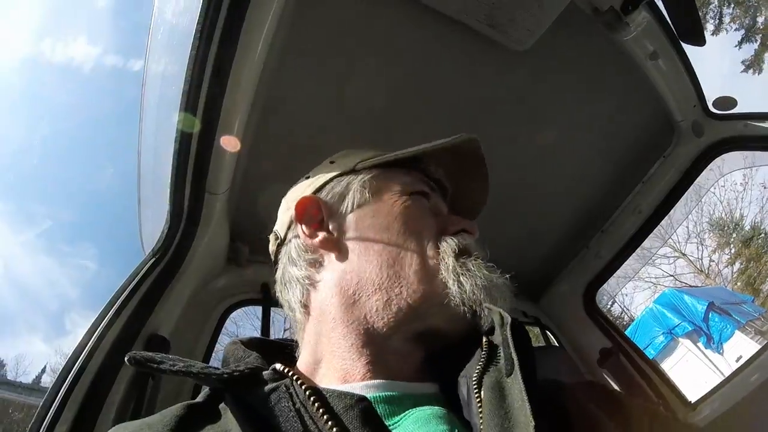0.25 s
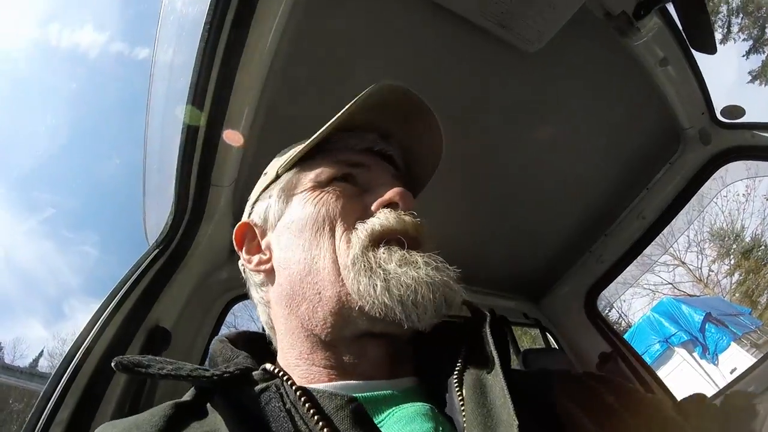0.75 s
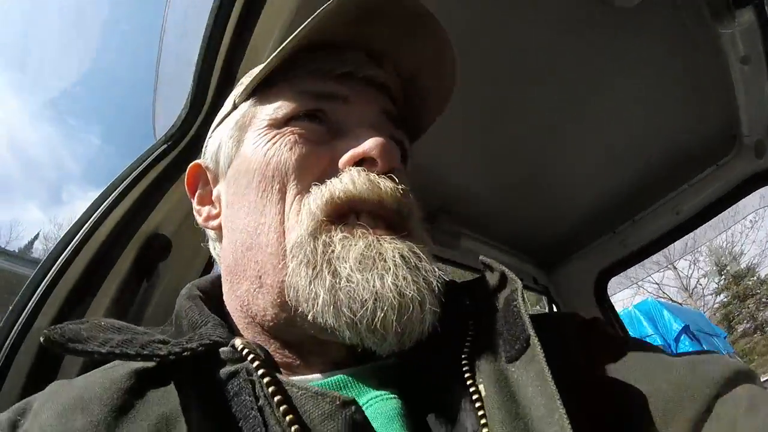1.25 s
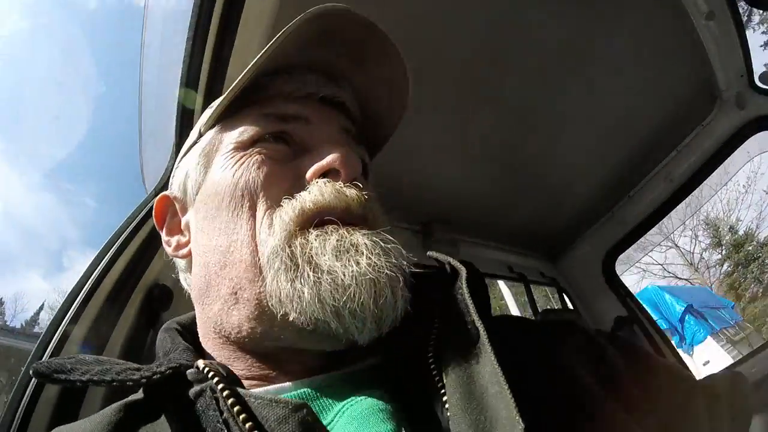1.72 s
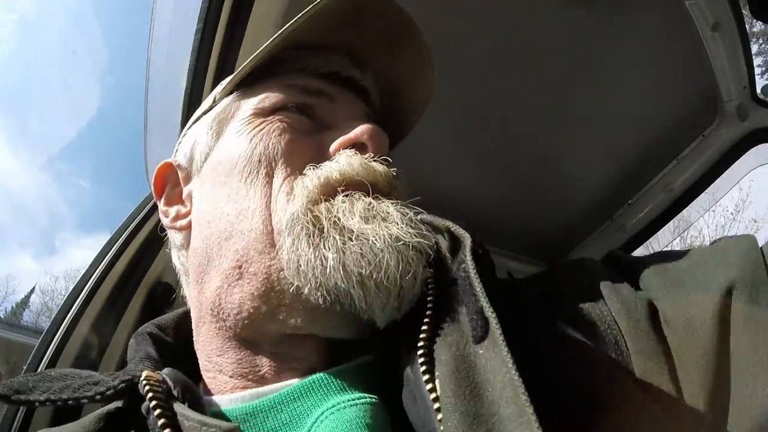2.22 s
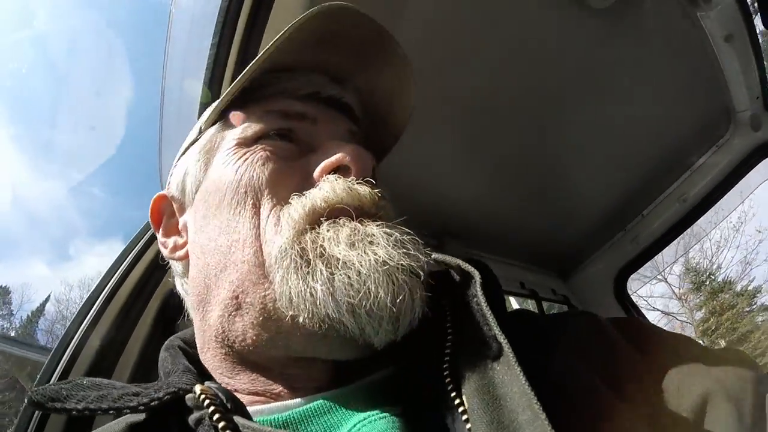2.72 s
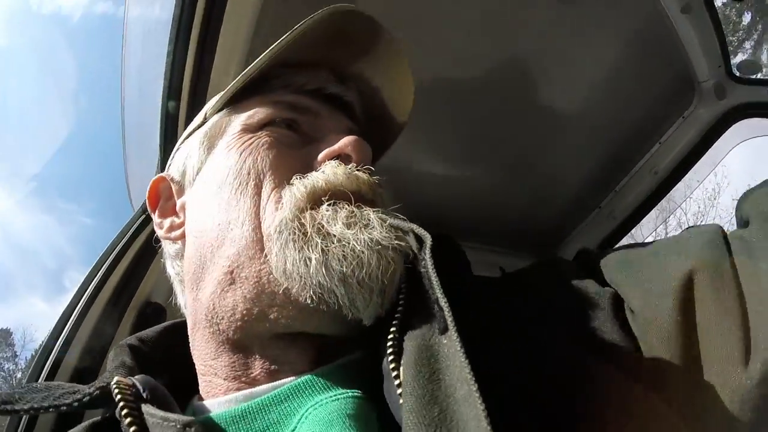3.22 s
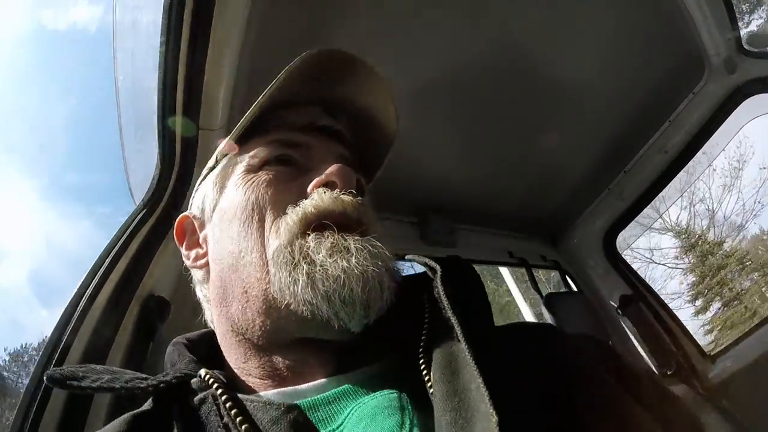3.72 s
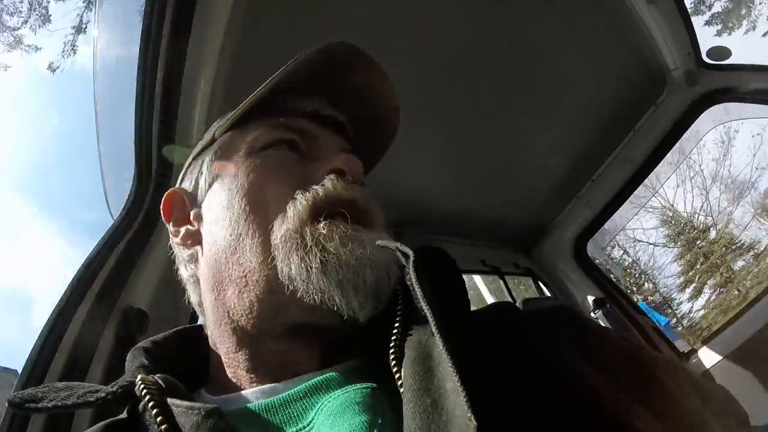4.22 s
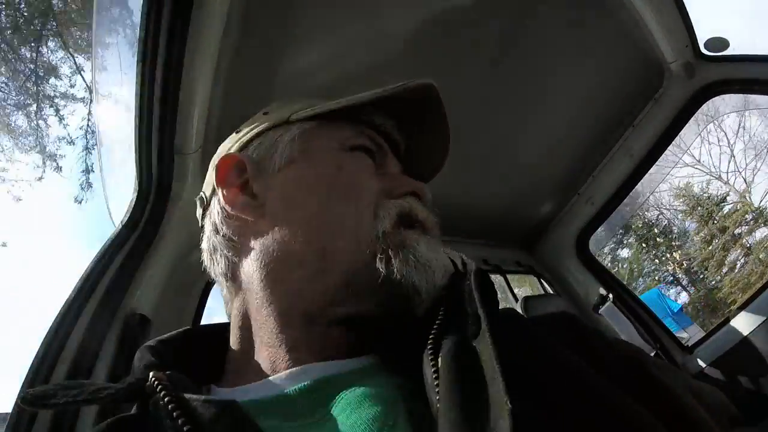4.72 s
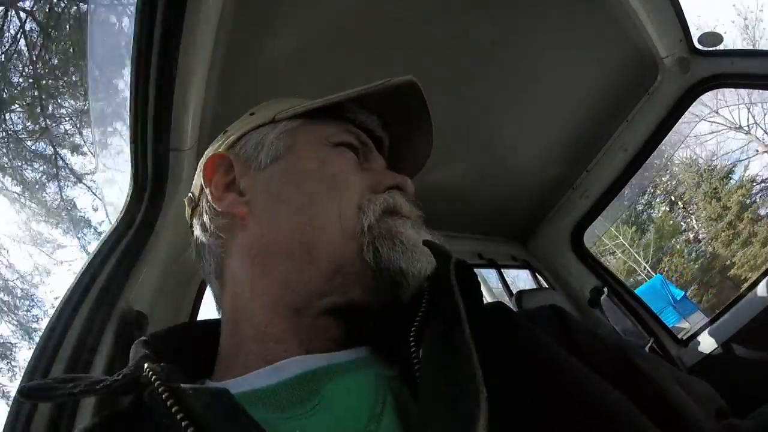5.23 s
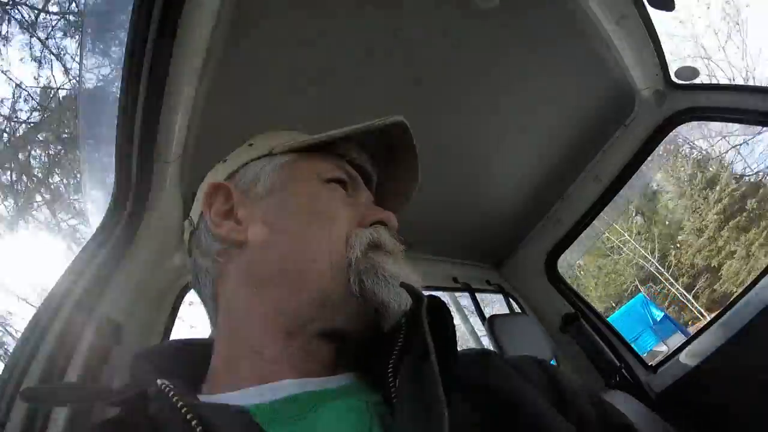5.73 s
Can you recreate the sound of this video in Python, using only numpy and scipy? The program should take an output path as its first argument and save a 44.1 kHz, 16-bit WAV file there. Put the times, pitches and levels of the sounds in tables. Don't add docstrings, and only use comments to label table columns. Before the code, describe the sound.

Inside a small truck cab, a lever clunks over an idling engine, then the clutch shudders and the engine revs up with growing rumble.

```python
import sys
import numpy as np
from scipy import signal
from scipy.fft import rfft, irfft, next_fast_len
from scipy.io import wavfile
from scipy.ndimage import uniform_filter1d, map_coordinates

SR = 44100
rng = np.random.default_rng(int(sys.argv[2]) if len(sys.argv) > 2 else 0)


def dump(signal):
    limited = np.clip(np.atleast_2d(signal).T, -1, 1)
    pcm = np.round(limited * 32767).astype(np.int16)
    wavfile.write(sys.argv[1], SR, pcm)


def gain_from_db(level_db):
    decades = np.asarray(level_db, float) / 20
    return 10 ** decades


N = 262836

# start_s, level_db
ROAD = [(0, -58), (.46, -51), (.58, -50.5), (.85, -52), (1.11, -52), (1.46, -44.5), (1.9, -50.5),
        (2.09, -43.5), (2.14, -41.5), (2.52, -41), (2.85, -48), (3.1, -44), (3.7, -46.5), (4.1, -38.5),
        (4.43, -40.5), (4.57, -38), (5.43, -37), (5.7, -34.5), (5.96, -33.5)]


def unit(x):
    return x / np.sqrt(np.mean(x ** 2) + 1e-20)


def curves(rows):
    s, *cols = np.transpose(rows)
    return [np.interp(np.arange(N) / SR, s, c) for c in cols]


def wobble(rate):
    knots = rng.standard_normal(int(N * rate / SR) + 4)
    return map_coordinates(knots, [np.arange(N) * rate / SR])


def filtered(x, response):
    n = x.shape[-1]
    padded = next_fast_len(n + SR // 4)
    spectrum = rfft(x, padded) * response(np.fft.rfftfreq(padded, 1 / SR))
    return irfft(spectrum, padded)[..., :n]


def colour(points):
    f, db = np.transpose(points)
    return lambda hz: gain_from_db(np.interp(np.log(hz + 1), np.log(f + 1), db, -120, -120))


def modes(table):
    def response(f):
        return sum((-1) ** k * gain_from_db(db) * 1j * f * width / (centre ** 2 - f * f + 1j * f * width)
                   for k, (centre, width, db) in enumerate(table))
    return response


def rush(points, patchy_db, grain_db=0):
    raw = rng.standard_normal(N) * gain_from_db(grain_db * wobble(400))
    z = signal.stft(raw, nperseg=512)[2]
    field = uniform_filter1d(rng.standard_normal(z.shape), 5, 0)
    field = uniform_filter1d(field, 8, 1)
    patched = signal.istft(z * gain_from_db(patchy_db * unit(field)), nperseg=512)[1][:N]
    return unit(filtered(patched, colour(points)))


def swells(rows):
    t = np.arange(N) / SR
    energy = 0
    for s, db, rise, fall in rows:
        bell = np.exp(-((t - s) / np.where(t < s, rise, fall)) ** 2 * 2)
        energy = energy + gain_from_db(2 * db) * bell
    return np.sqrt(energy)


def contacts(rows, t60, rise, push, grit_db):
    # centre_hz, width_hz, level_db
    trim = [(393, 21, 1.5), (496, 50, 10.5), (660, 132, 8.5), (863, 140, 3.5), (1050, 180, 3),
            (1526, 430, -0.5), (2000, 370, -2.5)]
    # centre_hz, width_hz, level_db
    floor = [(133.6, 13.4, 3.5), (203, 21, 1), (260, 84, -5.5), (407, 78, -7)]
    # frequency_hz, level_db
    click_spectrum = [(880, -14), (1500, -4.5), (2010, -1), (2350, -9.5), (3280, -6.5), (4570, -8.5),
                      (5720, -15), (6560, -11.5), (12100, -34), (15500, -61)]
    out, t = np.zeros(N + SR), np.arange(SR // 4) / SR
    s, click_db, knock_db, thud_db, hz = np.array(rows).T[:, :, None]
    burst = rng.standard_normal((len(rows), 4, len(t)))
    grit = gain_from_db(grit_db * unit(uniform_filter1d(burst[:, 3], size=120)))
    shape = (1 - np.exp(-t / rise)) * gain_from_db(-60 * t / t60) * grit
    blow = push * (t / 0.00065) * np.exp(-t / 0.00037)

    def spot(f):
        near = 1j * f * .5 * hz / (hz * hz - f * f + 1j * f * .5 * hz)
        return modes(trim)(f) * (0.44 + near)

    def peak(x):
        return x / np.abs(x).max(axis=1, keepdims=True)

    snap = 1 + 0.87 * push * gain_from_db(-60 * t / 0.0091)
    click = filtered(shape * burst[:, 0] * snap, colour(click_spectrum))
    knock = filtered(shape * burst[:, 1] + blow, spot)
    thud = filtered(shape * burst[:, 2] * gain_from_db(-60 * t / 0.26) + blow, modes(floor))
    sound = gain_from_db(click_db - 2.5) * peak(click)
    sound = sound + gain_from_db(knock_db + 1.0) * peak(knock)
    sound = sound + gain_from_db(thud_db - 3.5) * peak(thud)
    for start, one in zip(np.round(s[:, 0] * SR).astype(int), sound):
        out[start:start + len(t)] += one
    return out[:N]


def ringing(hits, table):
    out, t = np.zeros(N + SR), np.arange(SR // 4) / SR
    for s, db in hits:
        ring = 0
        for hz, level, t60 in table:
            decay = gain_from_db(level + rng.normal(0, 1.5) - 60 * t / t60)
            ring = ring + decay * np.sin(-2 * np.pi * hz * t)
        out[round(s * SR):][:len(t)] += gain_from_db(db) * ring * (1 - np.exp(-t / 0.00017))
    return out[:N]


def brief_tones(rows, rate):
    t = np.arange(N) / SR
    out = np.zeros(N)
    for s, hz, db, length in rows:
        envelope = gain_from_db(db) * np.exp(-((t - s) / (0.28 * length)) ** 2)
        out += envelope * np.sin(2 * np.pi * hz * t + 2 * wobble(rate))
    return out


def body_sway():
    # frequency_hz, level_db (per Hz)
    spectrum = [(6, -15.5), (12, -2), (20, -9.5), (32, -3.5), (48, -19), (60, -11), (80, -65.5)]
    # peak_s, level_db, rise_s, fall_s
    lurches = [(.45, -19.5, 0.05, 0.098), (1.36, -21.5, 0.091, 0.15), (1.7, -27, 0.34, 0.14),
               (2.04, -29, .06, 0.16), (2.7, -20, 0.29, 0.41), (3.3, -19, 0.26, 0.36),
               (3.9, -27, 0.22, 0.42), (4.7, -17, 0.33, 0.16), (5.05, -46, 0.058, 0.082),
               (5.65, -25, 0.14, 0.091), (5.96, -14.5, 0.14, 0.098)]
    rest_db = -41.5
    return np.hypot(gain_from_db(rest_db), swells(lurches)) * rush(spectrum, patchy_db=1.5)


def panel_boom(turn):
    # frequency_hz, level_db (per Hz)
    spectrum = [(32, -49), (55, 1.5), (65, -12.5), (92, -6), (110, -4), (130, -8), (192, -12), (222, -21),
                (254, -15), (276, -20), (313, -20), (369, -25.5), (419, -25.5), (480, -33), (620, -34.5),
                (1060, -120)]
    # peak_s, level_db, rise_s, fall_s
    blows = [(.04, -28.5, 0.041, 0.31), (.5, -32, 0.16, 0.39), (2.7, -29.5, 0.22, 0.052),
             (3.07, -28, 0.16, 0.076), (3.8, -29.5, 0.55, 0.26), (4.25, -47, 0.073, 0.18),
             (4.57, -25, 0.17, 0.1), (5.15, -24.5, 0.09, 0.084), (5.87, -20, 0.12, 0.059)]
    mean_db, growth = -30.5, 0.94
    road_db, = curves(ROAD)
    ground = gain_from_db(mean_db - 2.5 + growth * (road_db - road_db.mean()))
    firing = 1 + 0.33 * np.cos(turn)
    noise = unit(firing * gain_from_db(1.4 * wobble(25)) * rush(spectrum, patchy_db=1.0))
    return np.hypot(ground, swells(blows)) * noise


def road_roar(turn):
    # frequency_hz, level_db (per Hz)
    spectrum = [(180, -10), (300, 2), (357, -12), (496, -3), (711, -14.5), (788, -13), (929, -14),
                (1490, -17), (2140, -18), (2370, -29), (3500, -29), (4550, -34.5), (7700, -120)]
    # centre_hz, width_hz, level_db
    roof = [(568, 57, -11), (644, 22.6, 6.5), (782, 61, 0), (1246, 27, -5), (1458, 20, 3.5), (1570, 60, -3),
            (2024, 74, -8.5)]
    road_db, = curves(ROAD)
    noise = rush(spectrum, patchy_db=2.0, grain_db=0.97)
    noise = filtered(noise, lambda f: 1 + np.abs(modes(roof)(f)))
    firing = 1 + 0.052 * np.cos(turn)
    return gain_from_db(road_db) * unit(firing * gain_from_db(0.65 * wobble(24.64)) * noise)


def jacket():
    # frequency_hz, level_db (per Hz)
    spectrum = [(1290, -5), (2200, -3.5), (2800, -6.5), (3260, -8), (3650, -8), (4320, -6.5), (5590, -7.5),
                (6400, -7.5), (7400, -12.5), (8400, -13), (10100, -19.5), (11800, -19), (14300, -29.5),
                (15000, -31)]
    # peak_s, level_db, rise_s, fall_s
    strokes = [(.62, -66, 0.042, 0.029), (1.22, -67.5, 0.33, .1), (1.37, -58.5, 0.15, 0.24),
               (1.58, -65.5, 0.15, 0.12), (1.78, -65.5, 0.11, 0.17), (2.22, -55.5, 0.14, 0.14),
               (2.55, -64.5, 0.17, 0.067), (3.16, -62.5, 0.4, 0.21), (3.16, -63, .025, .04),
               (3.4, -66, 0.053, 0.088), (3.56, -64, 0.065, 0.11), (3.84, -63, 0.15, 0.099),
               (4.0, -56.5, 0.034, 0.14), (4.18, -59.5, 0.21, 0.098), (4.485, -64, 0.014, .02),
               (5.8, -63, 0.28, 0.3)]
    rest_db, growth, dull_hz = -66, 0.41, 13200
    road_db, = curves(ROAD)
    rubbed = swells(strokes) * gain_from_db(8.5 + .8 * wobble(16)) * rush(spectrum, patchy_db=1.2, grain_db=1)
    still = filtered(rush(spectrum, patchy_db=2.0, grain_db=1.0), lambda f: 1 / (1 + (f / dull_hz) ** 4))
    return rubbed + gain_from_db(rest_db + 7.0 + growth * (road_db - road_db.mean())) * still


def squeaks_and_hums():
    # centre_s, pitch_hz, level_db, length_s
    squeaks = [(3.412, 3500, -45, 0.011), (3.416, 2730, -58, 0.017), (3.426, 860, -42, 0.047),
               (3.215, 1530, -40, 0.014), (4.84, 3927, -50, .014), (4.897, 3620, -44, 0.0089),
               (4.926, 772, -33, 0.048)]
    # centre_s, pitch_hz, level_db, length_s
    hums = [(2.12, 127, -30, 0.079), (2.53, 190, -31, 0.13), (2.69, 107.5, -26, 0.077),
            (3.08, 113.8, -20.5, 0.11), (4.55, 202, -27.5, 0.31), (4.88, 199, -30, 0.13),
            (5.05, 93.6, -20.5, 0.11), (5.15, 110, -25, 0.08), (5.36, 102, -32, .12),
            (5.85, 246.4, -29, 0.085)]
    return brief_tones(squeaks, rate=260) + brief_tones(hums, rate=12)


def trim_rattles():
    # start_s, click_db, knock_db, thud_db
    jolts = [(1.856, -60, -39, -28.5), (2.1316, -32.5, -42, -51), (2.3582, -37, -45, -31),
             (2.498, -50, -34.5, -24), (3.0799, -86, -38, -45), (3.812, -44, -35, -42),
             (4.7897, -48, -29, -41), (4.8469, -39, -35, -41), (5.0965, -40, -45, -58),
             (5.408, -65, -32, -17.5), (5.5007, -49, -40, -44), (5.75, -50, -34, -33),
             (5.7921, -51, -36, -16.5), (5.858, -60, -22, -16), (5.9292, -48, -27, -27)]
    centre_hz = 454
    rows = [(*row, centre_hz) for row in jolts]
    return contacts(rows, t60=0.17, rise=0.00053, push=8.6, grit_db=4.5)


def jacket_ticks():
    # start_s, click_db, knock_db, thud_db, knock_hz
    ticks = [(0.5522, -50, -39, -52, 2000), (0.917, -43, -62, -68, 2000), (1.589, -33, -57, -62, 2000),
             (3.5281, -38, -55, -60, 2000), (3.8843, -35, -38, -52, 2000)]
    return contacts(ticks, t60=0.06, rise=0.00018, push=2.2, grit_db=-1.0)


def handling():
    # start_s, click_db, knock_db, thud_db, knock_hz
    touches = [(0.0014, -33.5, -30, -30, 2110), (0.0135, -38, -34, -13.5, 414),
               (0.0345, -52, -52, -17, 400), (0.0488, -33.5, -37, -39, 554), (0.0585, -47, -51, -34, 2000),
               (0.2124, -28, -28.5, -10.5, 1950), (0.243, -56, -32, -26, 377), (0.3253, -64, -34, -29, 410),
               (0.4108, -63, -46, -19.5, 393), (0.4292, -62, -41, -27, 384), (0.4508, -63, -39, -17, 424),
               (0.5574, -30.5, -40, -48, 1700), (0.5975, -44, -37, -41, 900), (0.668, -56, -43, -21, 1200),
               (0.5834, -40, -34, -25.5, 2000), (0.6091, -54, -37.5, -15.5, 540),
               (0.6284, -59, -30, -20.5, 503), (0.7187, -70, -33, -46, 525), (1.2474, -56, -30, -22.5, 506),
               (1.2562, -61, -27.5, -29, 650), (1.2734, -53, -36, -20.5, 681),
               (1.5207, -50, -37, -21.5, 382)]
    return contacts(touches, t60=0.13, rise=0.0012, push=2.3, grit_db=-1.0)


def snaps():
    # start_s, click_db, knock_db, thud_db, knock_hz
    sharp = [(0.193, -13.5, -19, -32, 1020), (0.2004, -12, -19, -26, 1680), (0.4878, -28, -30, -29, 2040),
             (0.3874, -47, -40.5, -23, 1420), (0.8364, -46, -37.5, -26, 560),
             (0.6499, -41, -29.5, -17.5, 1640), (0.7024, -38, -29, -23.5, 710),
             (0.9897, -35, -45, -50, 2000), (2.0846, -49, -33, -49, 800), (2.713, -42, -48, -49, 1510),
             (2.7294, -52, -37, -36, 755), (3.398, -41, -54, -50, 2000), (3.5772, -50, -29.5, -37, 683),
             (3.978, -33.5, -35, -26, 686), (4.4894, -45, -32, -36, 1450), (4.9985, -38.5, -32, -32, 900),
             (5.2061, -16.5, -27, -44, 1040), (5.2085, -17.5, -25, -52, 1040),
             (5.2175, -30, -36, -36, 1500), (5.2294, -28, -45, -40, 1050)]
    # start_s, click_db, knock_db, thud_db, knock_hz
    dry_click = [
        (1.4036, -19.5, -21, -33, 850),
    ]
    out = contacts(sharp, t60=0.089, rise=0.00069, push=1.67, grit_db=2.0)
    return out + contacts(dry_click, t60=0.02, rise=0.0002, push=1, grit_db=0.5)


def lever_rings():
    # pitch_hz, level_db, t60_s
    lever = [(363, -1, .06), (484, -14, .06), (1000, -24, .04), (1136, -21, .11), (1530, -21, .1),
             (1960, -23, .14), (2890, -30, .05), (3260, -21, .07), (3830, -28, .05), (4700, -34, .07),
             (6450, -33, .08)]
    # start_s, level_db
    lever_hits = [
        (0.1951, -8),
        (0.2006, -9),
    ]
    # pitch_hz, level_db, t60_s
    tunnel = [(134.5, 0, .22), (152, -1, .13), (205, -12, .06)]
    # start_s, level_db
    tunnel_hits = [
        (0.0118, -22),
        (0.1926, -19),
        (0.1998, -8.5),
    ]
    # pitch_hz, level_db, t60_s
    knob = [(560, 0, .05), (650, -1, 0.11), (850, -21, 0.039), (1280, -10, .04), (1610, -6, 0.019)]
    # start_s, level_db
    knob_hits = [(1.2485, -29.5), (1.2565, -34), (1.268, -41), (1.283, -36), (1.297, -39), (5.845, -29),
                 (5.862, -37)]
    return ringing(lever_hits, lever) + ringing(tunnel_hits, tunnel) + ringing(knob_hits, knob)


def pedal_rings():
    # pitch_hz, level_db, t60_s
    pedal = [(273, -10, .06), (393, -1.5, 0.13), (487, -17, 0.062)]
    # start_s, level_db
    pedal_hits = [(.0135, -29), (.411, -24), (.429, -27), (.451, -27), (.609, -35), (.628, -38)]
    return ringing(pedal_hits, pedal)


def small_part_rings():
    # pitch_hz, level_db, t60_s
    latch = [(768, 5, .048), (1320, 0, .025), (1750, -1, .016), (2200, 1, .014), (3500, -7, .012),
             (5700, -9, .01), (7200, -9, .01), (9500, -9, .01), (13000, -17, .008)]
    # start_s, level_db
    latch_hits = [
        (1.4037, -37),
        (1.4056, -26),
    ]
    # pitch_hz, level_db, t60_s
    catch = [(1035, 4, 0.051), (1530, -3, 0.055), (2070, -6, .04), (2480, -12, .04), (3690, -1, .04),
             (4090, -8, 0.056)]
    # start_s, level_db
    catch_hits = [(5.2075, -31), (5.2100, -31.5), (5.2125, -33), (5.2175, -29), (5.231, -51)]
    # pitch_hz, level_db, t60_s
    lid = [(637, -15, 0.034), (770, -0.5, 0.038), (1190, -5, 0.027), (1450, 1, 0.027), (2000, -3, 0.024),
           (3250, -14.5, 0.017), (5200, -21, .01)]
    # start_s, level_db
    lid_hits = [(.327, -54), (.388, -46), (.651, -39), (.704, -36), (.837, -43), (2.0855, -39),
                (2.711, -37), (2.736, -38.5), (3.08, -49), (3.208, -46), (3.578, -44), (3.801, -41),
                (3.827, -39), (3.979, -32), (4.051, -40), (4.17, -40), (5.094, -35), (5.294, -47),
                (5.401, -40), (5.858, -35)]
    # pitch_hz, level_db, t60_s
    keys = [(2000, -4, 0.036), (4400, -13, 0.018), (5250, 0, 0.015), (6000, -3, 0.012), (8000, -14, 0.014),
            (11500, -20, 0.027)]
    # start_s, level_db
    zip_hits = [(.553, -46), (.559, -37.5), (.566, -42), (.574, -45), (.5855, -39), (.593, -46),
                (.602, -50), (.611, -50), (.621, -48), (.632, -52), (.9897, -46)]
    out = ringing(latch_hits, latch) + ringing(catch_hits, catch)
    return out + ringing(lid_hits, lid) + ringing(zip_hits, keys)


def driveline():
    # start_s, rate_hz
    shaft = [(1.88, 29.5), (2.55, 28.68), (3.0, 31.07), (3.38, 38), (3.55, 35), (3.84, 46), (4.15, 29.82),
             (4.5, 31.58), (4.95, 34.84), (5.3, 37.08), (5.8, 37.03), (5.96, 28.9)]
    # peak_s, level_db, rise_s, fall_s
    grabs = [(1.97, -23, 0.09, 0.7), (2.28, -21, 0.071, 0.23), (2.55, -21, 0.22, 0.062),
             (2.69, -20, 0.034, 0.21), (2.95, -25.5, 0.041, 0.11), (3.39, -17.5, 0.14, .07),
             (3.65, -19.5, 0.089, .1), (3.82, -14, .07, 0.042), (4.52, -19, 0.45, 0.087),
             (4.94, -14, 0.23, 0.13), (5.23, -12.5, 0.17, 0.075), (5.45, -12, 0.23, 0.14),
             (5.71, -11.5, 0.028, 0.064), (5.798, -10, 0.02, 0.032), (5.93, -13, 0.039, 0.2)]
    hz = curves(shaft)[0] * (1 + 0.014 * wobble(7.4))
    turn = 2 * np.pi * np.cumsum(hz) / SR
    shudder = np.sin(turn) + gain_from_db(-18.5) * np.sin(2 * turn - 1.6)
    return swells(grabs) * gain_from_db(3.0 + 1.54 * wobble(22)) * shudder


def engine():
    # start_s, firing_hz, tone_db, overtones_db
    running = [(0, 43.8, -31, -48), (.65, 43.4, -32, -47), (1.25, 43.5, -29, -45), (1.4, 41.5, -35, -53),
               (1.7, 38, -39, -54), (2.3, 40.5, -33, -50), (2.85, 42.8, -23, -46), (3.02, 42, -20, -44),
               (3.27, 41, -31, -46), (3.45, 41.5, -33, -43), (3.6, 45.5, -33, -42), (3.78, 51.5, -30, -39),
               (3.92, 55, -28, -41), (4.2, 64, -25, -39), (4.55, 68.5, -31, -34), (4.8, 70.5, -40, -36),
               (5.3, 76, -38, -35), (5.55, 80, -24, -39), (5.8, 86, -22, -38), (5.96, 89, -28, -37)]
    # multiple of firing, level_db
    overtones = [(2, 0), (3, 2), (4, -1), (5, -14), (6, -6), (7, -14), (8, -12), (13, -6)]
    # centre_hz, width_hz, level_db
    cabin = [(104, 24, 5), (138, 30, 7), (200, 24, -2), (264, 16, 5), (340, 60, -16), (565, 40, -12)]
    hz, tone_db, over_db = curves(running)
    turn = 2 * np.pi * np.cumsum(hz * (1 + .005 * wobble(15))) / SR
    tone = gain_from_db(tone_db + 3 + 3 * wobble(14)) * np.sin(turn)
    over = np.zeros(N)
    for multiple, db in overtones:
        level = gain_from_db(db + 2 * wobble(8.9))
        over += level * np.sin(multiple * turn + rng.uniform(0, 2 * np.pi))
    return tone + filtered(gain_from_db(over_db) * over, modes(cabin)), turn


def scene():
    motor, turn = engine()
    cab = body_sway() + panel_boom(turn) + road_roar(turn) + jacket()
    loose = squeaks_and_hums() + trim_rattles() + jacket_ticks()
    driver = handling() + snaps() + lever_rings() + pedal_rings() + small_part_rings()
    return (cab + loose + driver + driveline() + motor)[None]


def roll_off(x):
    return signal.sosfilt(signal.butter(12, 15710, fs=SR, output="sos"), x)


def record(dry):
    mix = dry / (1 + np.abs(dry) ** 8) ** (1 / 8)
    return roll_off(mix)


dry = scene()
out = record(dry)
dump(out)
```